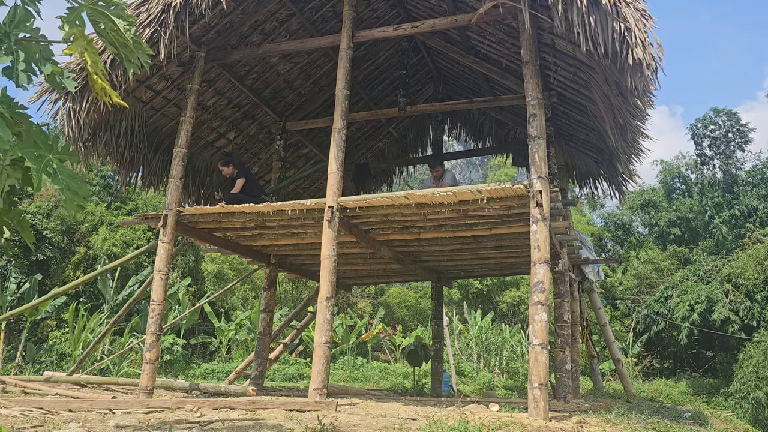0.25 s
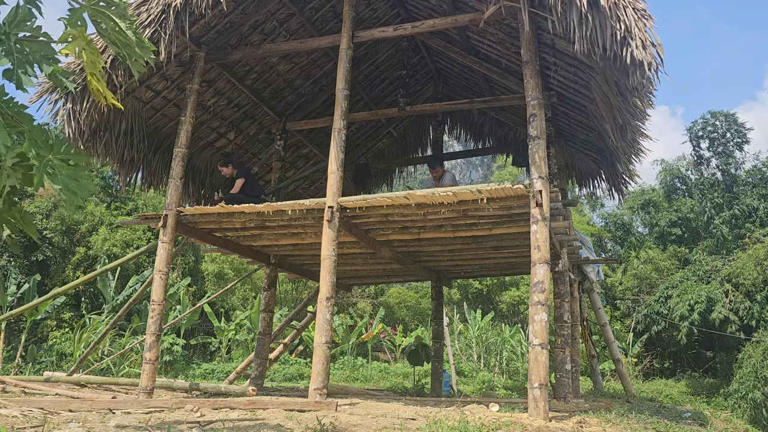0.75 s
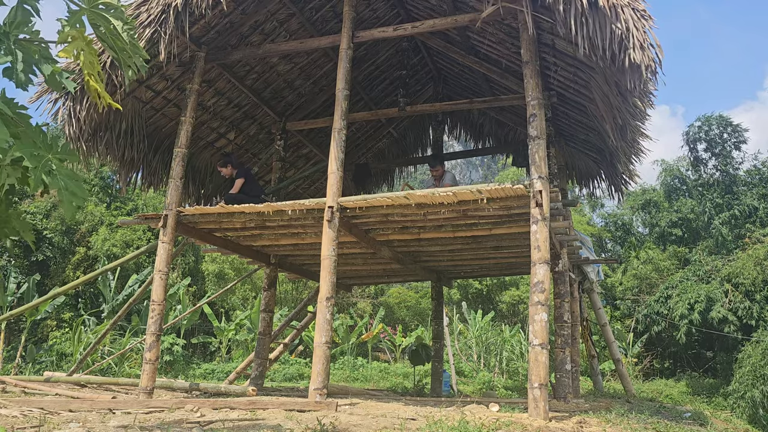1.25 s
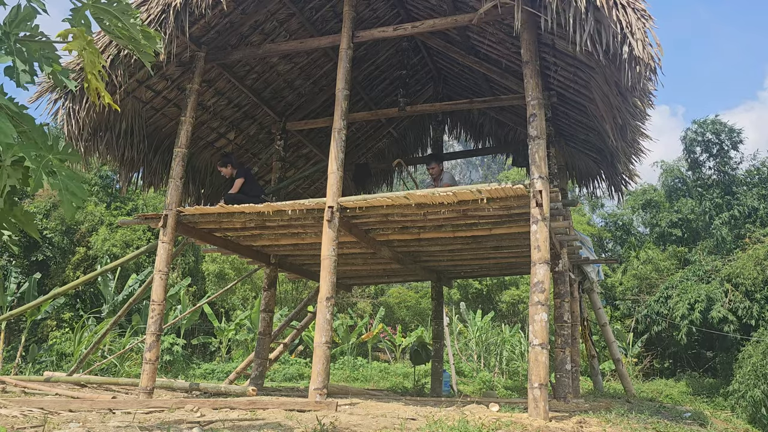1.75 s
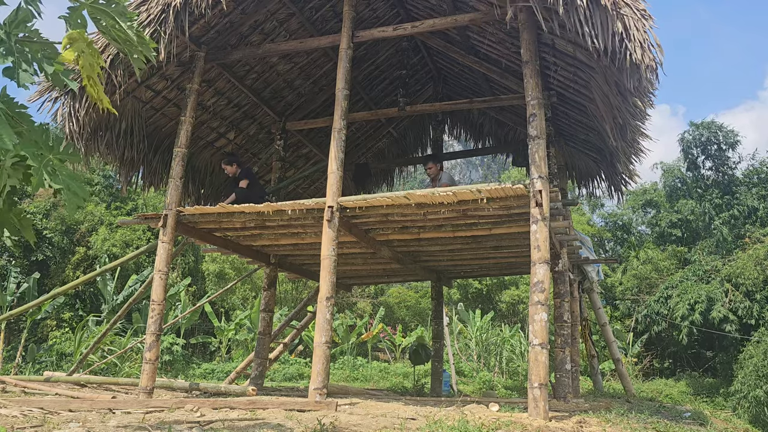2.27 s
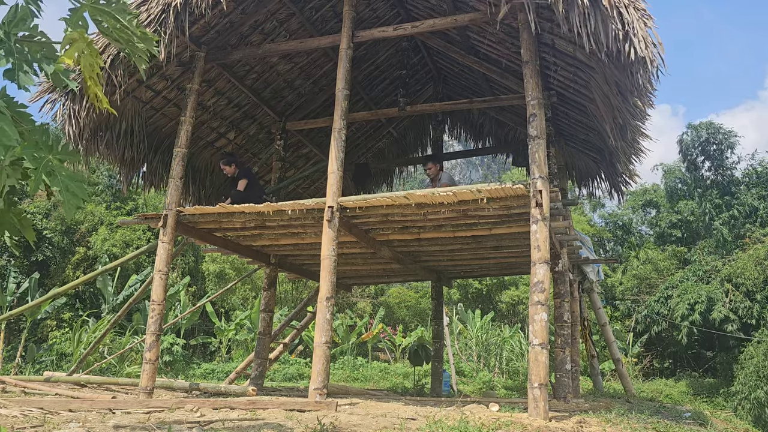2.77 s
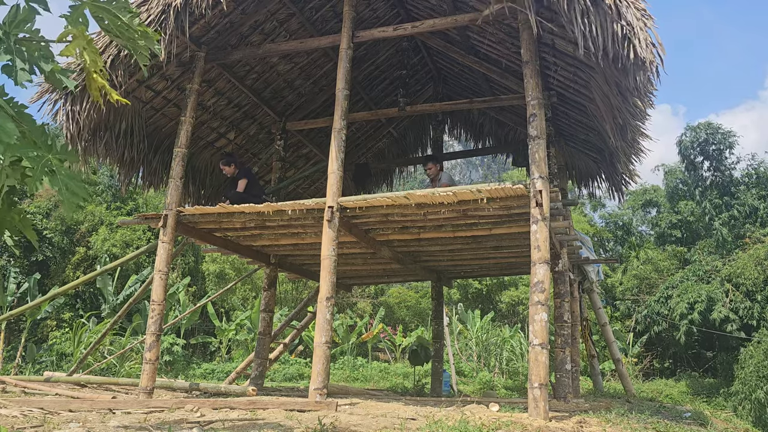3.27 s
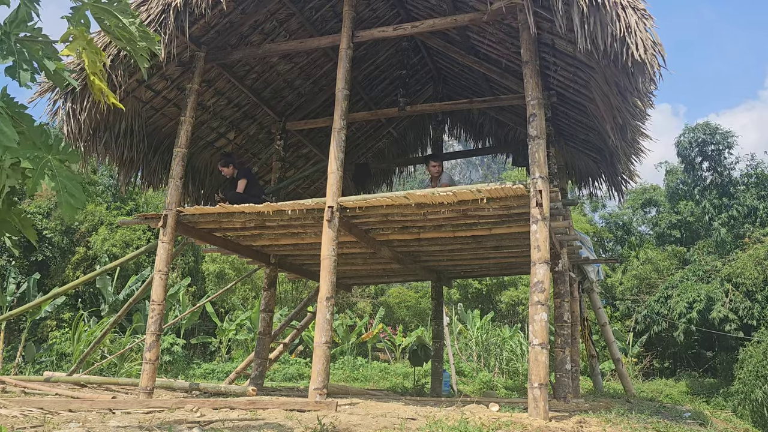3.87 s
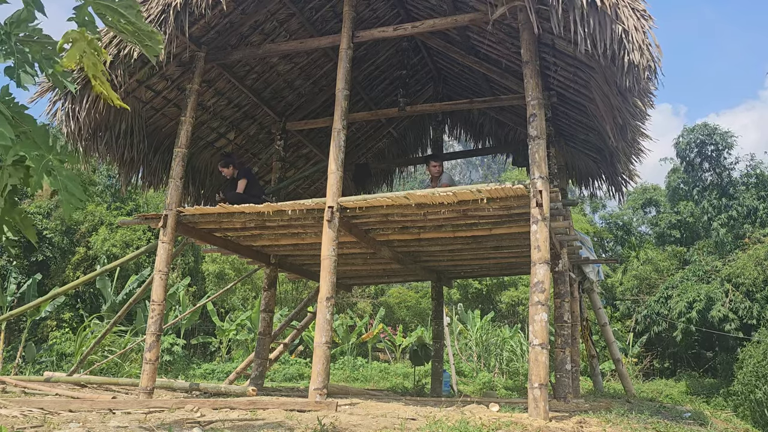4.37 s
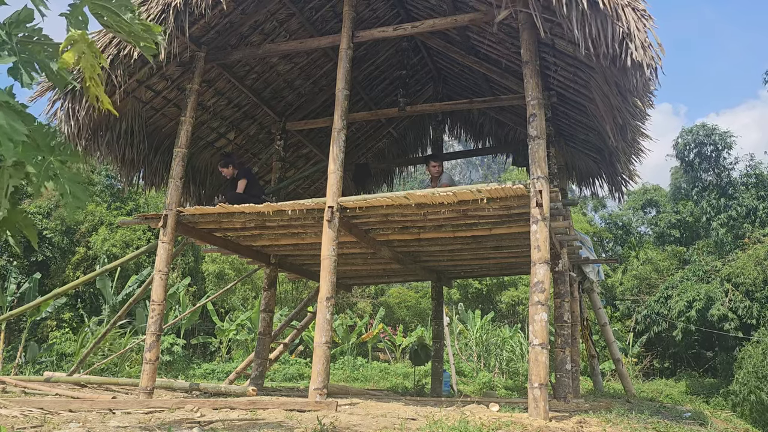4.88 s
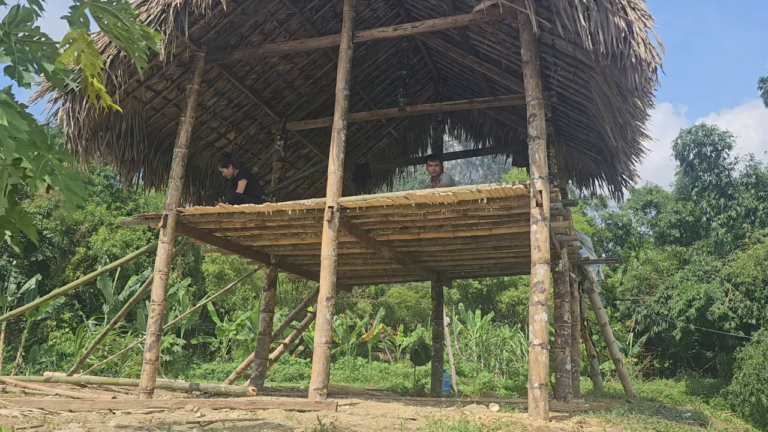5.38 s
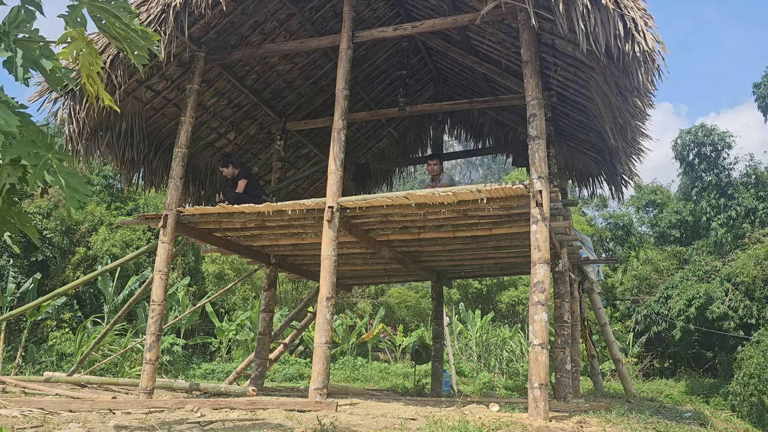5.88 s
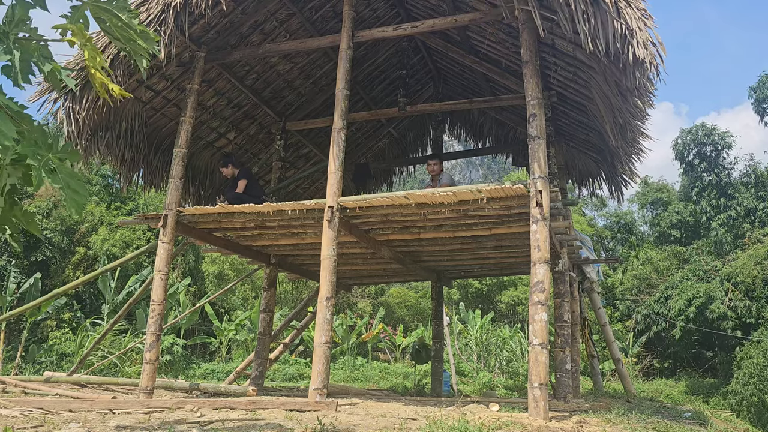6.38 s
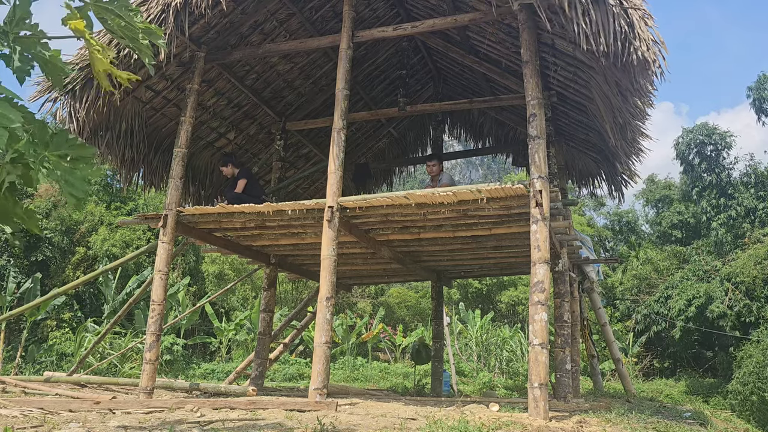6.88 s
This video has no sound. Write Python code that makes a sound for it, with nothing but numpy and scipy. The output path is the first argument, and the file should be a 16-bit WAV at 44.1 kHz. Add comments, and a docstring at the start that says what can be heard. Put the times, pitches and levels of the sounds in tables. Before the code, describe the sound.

A rural yard beside an open thatched stilt house, in stereo from a modest distance. From 0.04 s a blade chops the split-bamboo floor roughly every 0.46 s: dry, woody cracks around 1 to 3 kHz with crisp splinters, a brief hollow cane note near 1.05 kHz and a short scatter under the roof. Three short saw strokes rasp at about 0.2, 0.5 and 0.85 s, ringing a pole near 750 Hz, the last strongest. After the chop at 1.87 s a beat is missed; faint slat ticks fall at 2.45 to 2.65 s, and chopping resumes at 2.75 s. Soft hollow rebounds follow blows at 3.7 and 4.6 s. From 5.5 s blows slow slightly, to 7.05 s. Throughout, a throbbing cicada whines near 4.75 kHz, fading after 5 s, over a narrow distant insect hiss, faint leaf rustle and uneven low wind rumble with brief gusts.

```python
"""Yard of a thatched stilt house: a blade chops into its split-bamboo floor, about two blows a second.
Each blow crushes fibres (noise burst), rings the hollow cane and slats (damped modes) and scatters
under the roof; twice a loose cane rocks back, and slats tick lightly. At first a saw takes three
strokes: noisy tooth catches drive a rasp and a ringing pole. Cicadas sing (frequency-swung partials,
narrow-band hiss); a light breeze rumbles at the microphone over leaf rustle (coloured noise)."""
import sys
import numpy as np
from scipy import signal
from scipy.fft import rfft, irfft, next_fast_len
from scipy.io import wavfile
from scipy.ndimage import uniform_filter1d

SR = 44100
rng = np.random.default_rng(int(sys.argv[2]) if len(sys.argv) > 2 else 0)


def digitize_waveform(pressure):
    """Quantize a signal to 16-bit integers and store it at the path in sys.argv[1].

    Rows of a 2-D input are taken as channels; values are limited to [-1, 1].
    """
    field = np.atleast_2d(pressure).T
    bounded = np.clip(field, -1, 1)
    quanta = np.round(bounded * 32767).astype(np.int16)
    wavfile.write(sys.argv[1], SR, quanta)


N = 314874  # samples

# chops: t/s, faint noisy onset ahead of blow/s, crushing time/s, cane pitch f/Hz, struck-spot pitch f/Hz,
# spot re crack level/dB, cane ring level/dB, crack level/dB, splinter level/dB
CHOPS = [(0.0363, 0.0039, .0008, 1040, 2660, -0.5, -53, -37.5, -38),
         (0.4894, 0.0023, 0.00033, 1045, 2550, -2.5, -38, -34.5, -39.5),
         (0.9496, 0.0054, 0.00079, 1150, 2340, -22, -47.5, -36.5, -41),
         (1.4084, .0037, 0.0017, 1030, 2520, -16, -44, -37.5, -40),
         (1.867, 0.0055, 0.0015, 1057, 1490, -12, -42, -37, -39.5),
         (2.7479, 0.0017, 0.00087, 1070, 2420, 3.5, -45, -35.5, -40),
         (3.1987, 0.00099, 0.0015, 1041, 1590, -6, -44.5, -40, -39),
         (3.6653, 0.0033, 0.0041, 1080, 2160, -7, -39, -38, -43.5),
         (4.1273, 0.0027, 0.0029, 1127, 940, -11, -39.5, -37.5, -40),
         (4.5863, 0.0043, 0.0031, 1076, 2130, -5, -41, -39, -36),
         (5.0511, .0039, 0.0017, 1078, 2450, -12, -34.5, -37.5, -35),
         (5.524, .0047, 0.013, 1080, 1420, -8, -35.5, -39, -41),
         (6.066, 0.0035, 0.0054, 1038, 1670, -15, -43, -40, -42.5),
         (6.5585, 0.0071, 0.0025, 1047, 1520, -2, -38, -34, -41),
         (7.045, 0.011, 0.0014, 1078, 1580, -20, -37, -39.5, -44)]
# floor slat modes: f/Hz, level/dB, t60/s
SLAT_MODES = [(456, -16.5, 0.6), (578.6, -1, 0.098), (685, -15, 0.21), (821, -0.5, 0.065), (1249, -5, 0.21),
              (1514, -6, 0.14), (2274, 0.5, 0.035), (3500, -1.5, 0.0083)]
# crack colour of a blow: f/Hz, level/dB
CRACK_COLOUR = [(100, -28.5), (400, -15), (600, -11.5), (1000, 1.5), (1300, 0), (1600, 2.5), (2600, 0),
                (3600, -2), (4800, -41), (9000, -39.5)]
# splinter colour of a blow: f/Hz, level/dB
SPLINTER_COLOUR = [(1500, -43), (3000, -12), (4200, 3), (5600, 1.5), (7000, -6), (8000, -5), (9800, -8.5),
                   (12000, -4.5), (15500, -12)]
# scatter decay under the roof: f/Hz, t60/s
ROOF_DECAY = [(300, 0.56), (1000, 0.16), (2500, 0.14), (10000, 0.15)]
# left-right likeness of the scatter: f/Hz, correlation/1
ROOF_LIKENESS = [(300, 0.83), (1100, 0.94), (2200, 0.81), (4000, 0.3), (12000, 0.091)]
# floor edge shading the direct treble: f/Hz, level/dB
FLOOR_EDGE_SHADOW = [(5500, 2.5), (8000, 3), (15000, -19)]
# loose cane rocking back: t/s, level/dB
REBOUNDS = [(3.709, -53), (4.624, -48)]
# loose cane modes: f/Hz, level/dB
LOOSE_CANE_MODES = [(1085, 1), (1500, -2)]
REBOUND_RISE_S, REBOUND_T60_S = 0.0073, 0.07
# light handling taps: t/s, wood level/dB, splinter level/dB
TAPS = [(2.464, -71, -70), (2.532, -66.5, -55.5), (2.642, -68.5, -74), (4.393, -89, -70)]
# saw strokes, push and pull in turn: full bite at t/s, held for/s, level/dB
SAW_STROKES = [(.218, 0.1, -43.5), (0.528, 0.11, -50), (.838, 0.038, -39.5)]
# sawn pole modes: f/Hz, width/Hz, level/dB
POLE_MODES = [(264, 24, -1.5), (565.5, 18, -1), (640, 46, -3), (751, 16.4, 6.5), (1004, 45, -3.5),
              (1133, 16, -7.5), (1560, 69, -15), (1920, 110, -19)]
# tooth rasp colour: f/Hz, level/dB
TEETH_COLOUR = [(400, -19.5), (1200, -5.5), (2200, -1), (3200, -2), (5000, -10), (8000, -11.5),
                (12000, -13.5), (15500, -19)]
# left-right likeness of the rasp: f/Hz, correlation/1
RASP_LIKENESS = [(700, 0.94), (1400, 0.77), (3100, 0.12), (9000, 0.09)]
SAW_RISE_DB_PER_S, SAW_FALL_DB_PER_S = 210, 360  # the blade speeds up, then stops
TEETH_DB, TEETH_EXPONENT = -48.5, 0.85  # rasp at average force; grows less with force than the pole's ring
# near cicada: t/s, pitch f/Hz, level/dB
NEAR_CICADA = [(0, 4750, -61), (1.2, 4740, -60.5), (1.65, 4740, -63.5), (2.25, 4755, -60.5),
               (3, 4776, -64.5), (3.8, 4790, -62.5), (4.85, 4784, -63), (5.8, 4760, -69.5),
               (7.1, 4680, -79.5)]
# near cicada partials: multiple of tymbal rate/1, level/dB
TYMBAL_PARTIALS = [(4, -19.5), (5, 2), (6, -12.5)]
THROB_MEAN_HZ = 34.4
SWING_START_HZ, TIRES_AT_S, SWING_GROWTH_HZ_PER_S = 31.8, 3.1, 18  # pitch swing within each throb
CHORUS_CENTRE_HZ, CHORUS_MEAN_DB = 5215, -72  # far cicadas
# wind rumble colour: f/Hz, level/dB
RUMBLE_COLOUR = [(12, -34), (20, -12.5), (48, -3), (70, -1), (114, -7.5), (214, -19), (290, -23),
                 (334, -33), (425, -42), (500, -46.5), (650, -65), (1100, -120)]
# leaf rustle colour: f/Hz, level/dB
LEAF_COLOUR = [(150, -5), (300, 1.5), (500, 6.5), (800, 3.5), (1100, 0.5), (2000, 0.5), (4000, -1),
               (5500, -3.5), (7000, -5), (8400, -4.5), (10000, -6), (14000, -9), (16000, -18.5)]
# gusts (> 0 dB) and lulls (< 0 dB): middle t/s, half length/s, level/dB
GUSTS = [(.83, 0.033, 9), (1, 0.14, -6.5), (1.21, 0.15, 5), (2.05, 0.095, 6), (2.5, 0.57, -4.5),
         (3.108, 0.022, 9.5), (4.053, 0.058, -9.5), (4.763, 0.1, 4), (5.103, 0.037, 10), (5.438, 0.041, 4),
         (5.651, 0.073, -7.5), (6.495, 0.26, -3.5), (6.736, 0.027, 5.5), (6.967, 0.092, -11)]
# left-right likeness of rumble and of leaves: f/Hz, correlation/1
RUMBLE_LIKENESS = [(40, 0.97), (130, 0.82), (300, 0.61)]
LEAF_LIKENESS = [(400, 0.79), (1400, 0.016), (8000, 0.043)]
BREEZE_DB, LEAVES_DB = -46.3, -62.0  # steady flow before gusts; rustle
BAND_LIMIT_HZ = 15700


def amp(db):
    """Decibels to gain."""
    return 10 ** (np.asarray(db) / 20)


def unit(x):
    """Scale to rms 1."""
    return x / np.sqrt(np.mean(x ** 2) + 1e-20)


def burst(x):
    """Scale a short sound to the energy of rms 1 over 0.1 s."""
    return unit(x) * np.sqrt(SR / 10 / x.shape[-1])


def along(points, hz):
    """Interpolate (Hz, value) points on a log-frequency axis."""
    f, v = np.transpose(points)
    return np.interp(np.log(hz + 1), np.log(f + 1), v)


def curves(rows):
    """One value per sample for each column after the time."""
    t_s, *columns = np.transpose(rows)
    return [np.interp(np.arange(N) / SR, t_s, column) for column in columns]


def wobble(rate_hz):
    """Smooth random curve with rate_hz random knots a second."""
    knots = rng.standard_normal(int(N * rate_hz / SR) + 4)
    return signal.resample(knots, N)


def filtered(x, response):
    """Multiply the zero-padded spectrum of x by a complex response of frequency."""
    n = x.shape[-1]
    m = 2 * next_fast_len(n // 2 + 4096)
    spectrum = rfft(x, m) * response(np.fft.rfftfreq(m, 1 / SR))
    return irfft(spectrum, m)[..., :n]


def coloured(x, points):
    """Causal minimum-phase filter with the given (Hz, dB) shape."""
    def response(hz):
        cepstrum = irfft(np.log(amp(along(points, hz))))
        half = len(cepstrum) // 2
        cepstrum[1:half] *= 2  # fold to positive time
        cepstrum[half + 1:] = 0
        return np.exp(rfft(cepstrum))
    return filtered(x, response)


def resonance(f, hz, width_hz):
    """Response at f of one damped mode at hz, unity at its peak."""
    return 1j * f * width_hz / (hz * hz - f * f + 1j * f * width_hz)


def ringing(x, hz, t60_s):
    """One mode set ringing by x; its width follows from its decay."""
    width_hz = np.log(1000) / np.pi / t60_s
    return burst(filtered(x, lambda f: resonance(f, hz, width_hz)))


def placed(x, lead_ms, pan_db):
    """Stereo position: positive values make the left earlier and louder."""
    sides = np.array([[0.5], [-0.5]])
    lead_s = sides * lead_ms / 1000
    return amp(sides * pan_db) * filtered(x, lambda hz: np.exp(2j * np.pi * hz * lead_s))


def stereo_noise(likeness, size):
    """White noise pair; the mid/side balance sets left-right correlation by frequency."""
    def mid_side_gains(hz):
        angle = np.arccos(np.clip(along(likeness, hz), -1, 1)) / 2
        return np.array([np.cos(angle), np.sin(angle)])
    mid, side = filtered(rng.standard_normal((2, size)), mid_side_gains)
    return np.array([mid + side, mid - side])


def add(track, sound, t_s):
    """Mix a sound into the track at t_s."""
    part = track[:, max(round(t_s * SR), 0):][:, :sound.shape[1]]
    part += sound[:, :part.shape[1]]


def contact(t, onset_s, crush_s, onset_gain=0.12, snap=5):
    """Force on the cane: a faint noisy onset, the snap of the blow, then fibres giving way."""
    fibres = rng.standard_normal(len(t)) * np.exp(0.5 * rng.standard_normal(len(t)))
    crushing = np.exp(-np.abs(t) / max(crush_s, 1e-4))
    force = fibres * np.where(t >= 0, crushing, onset_gain * (t > -onset_s))
    force[np.searchsorted(t, 0)] += snap
    # bending waves carry the treble faster, which smears the snap
    return filtered(force, lambda hz: np.exp(-1j * np.sqrt(hz / 9)))


def under_roof(force, scatter_db, build_s=0.0005, trees_db=-31, trees_t60_s=0.5):
    """Direct sound, fast-dying scatter from beams and thatch, faint wash from the trees."""
    hz, t, noise = signal.stft(stereo_noise(ROOF_LIKENESS, len(force)), SR, nperseg=128)
    roof = amp(-60 * t / along(ROOF_DECAY, hz)[:, None])
    trees = amp(trees_db - 60 * t / trees_t60_s) / (1 + hz[:, None] / 3000)  # leaves swallow treble
    envelope = np.hypot(roof, trees) * (1 - np.exp(-t / build_s))
    tail = signal.istft(noise * envelope, SR, nperseg=128)[1]
    scatter = signal.fftconvolve(force[None], tail, axes=1)[:, :len(force)]
    direct = coloured(burst(force), FLOOR_EDGE_SHADOW)
    return placed(direct + amp(scatter_db) * burst(scatter), lead_ms=0.1, pan_db=1.0)


def cavity(t, hz, t60_s, filling_s):
    """Air in a cane takes a few ms to swell, then its tone dies quickly."""
    age = np.maximum(t, 0)
    envelope = amp(-60 * age / t60_s) * (1 - np.exp(-age / filling_s))
    return envelope * np.sin(2 * np.pi * hz * age)


def chops():
    """Each blow cracks, splinters, and rings the hollow cane and the slats around it."""
    out = np.zeros((2, N))
    before_s = 0.01
    t = np.arange(SR // 4) / SR - before_s
    for t_s, onset_s, crush_s, cane_hz, spot_hz, spot_db, ring_db, crack_db, splinter_db in CHOPS:
        force = contact(t, onset_s, crush_s)
        blow = under_roof(force, scatter_db=1.0)
        wood = burst(coloured(blow, CRACK_COLOUR))
        spot = ringing(wood, spot_hz, t60_s=0.009)  # wood right under the blade, heavily damped
        crack = amp(crack_db) * burst(wood + amp(spot_db) * spot)
        splinter = amp(splinter_db) * burst(coloured(blow, SPLINTER_COLOUR))
        hollow = cavity(t + onset_s / 2, cane_hz, t60_s=0.062, filling_s=0.012)
        cane = amp(ring_db) * placed(burst(hollow), lead_ms=0.095, pan_db=0.0)
        push = placed(coloured(force, CRACK_COLOUR), lead_ms=0.1, pan_db=-0.5)  # shakes the floor itself
        slats = sum(amp(db + 2 * rng.standard_normal()) * ringing(push, hz, t60_s)
                    for hz, db, t60_s in SLAT_MODES)
        slats_db = (crack_db + ring_db) / 2 - 13.5
        add(out, crack + splinter + cane + amp(slats_db) * slats, t_s - before_s)
    return out


def rebounds():
    """A loose cane settles back on its beam with a soft hollow knock of two cavity tones."""
    out = np.zeros((2, N))
    t = np.arange(SR // 4) / SR
    for t_s, level_db in REBOUNDS:
        knock = sum(amp(db) * cavity(t, hz, REBOUND_T60_S, REBOUND_RISE_S)
                    for hz, db in LOOSE_CANE_MODES)
        add(out, amp(level_db) * placed(burst(knock), lead_ms=0.11, pan_db=1), t_s)
    return out


def taps():
    """Loose slats tick as they are handled: brief contacts ring one wood mode."""
    out = np.zeros((2, N))
    t = np.arange(SR // 4) / SR
    for t_s, wood_db, splinter_db in TAPS:
        tick = under_roof(contact(t, 0, crush_s=0.0021), scatter_db=7)
        body = burst(coloured(tick, CRACK_COLOUR))
        wood = burst(body + amp(-3) * ringing(tick, hz=1640, t60_s=0.06))
        splinter = burst(coloured(tick, SPLINTER_COLOUR))
        add(out, amp(wood_db) * wood + amp(splinter_db) * splinter, t_s)
    return out


def stroke(bite_s, held_s):
    """Saw stroke level in dB re full bite: rise, hold, fall."""
    t = np.arange(N) / SR - bite_s
    rise_db = -SAW_RISE_DB_PER_S * np.maximum(-t, 0)
    fall_db = -SAW_FALL_DB_PER_S * np.maximum(t - held_s, 0)
    return rise_db + fall_db


def saw():
    """Teeth catch in a pole on the right; stroke force drives a rasp and the pole's hollow ring."""
    force = sum(amp(db + stroke(bite_s, held_s)) for bite_s, held_s, db in SAW_STROKES)
    average = amp(np.mean([db for _, _, db in SAW_STROKES]))
    catches = amp(1.6 * wobble(260) + 0.9 * wobble(45.24))
    rasp = placed(catches * stereo_noise(RASP_LIKENESS, N), lead_ms=-0.051, pan_db=0)
    pole = filtered(rasp, lambda f: sum(amp(db) * resonance(f, hz, width_hz)
                                        for hz, width_hz, db in POLE_MODES))
    teeth_gain = amp(TEETH_DB) * (force / average) ** TEETH_EXPONENT
    return force * unit(pole) + teeth_gain * unit(coloured(rasp, TEETH_COLOUR))


def phase(hz):
    """Running phase in radians of a varying frequency."""
    return 2 * np.pi * np.cumsum(hz) / SR


def near_cicada():
    """Tymbal partials whine in fast throbs whose pitch swing widens as the insect tires."""
    pitch_hz, level_db = curves(NEAR_CICADA)
    tired_s = np.maximum(np.arange(N) / SR - TIRES_AT_S, 0)
    swing_hz = SWING_START_HZ + SWING_GROWTH_HZ_PER_S * tired_s
    throb = np.cos(phase(THROB_MEAN_HZ + 1.63 * wobble(4.3)))
    tymbal = phase(pitch_hz + swing_hz * throb + 9 * wobble(200)) / 5  # pitch is the fifth partial
    whine = sum(amp(db) * np.sin(round(k) * tymbal) for k, db in TYMBAL_PARTIALS)
    flutter_db = 1.1 * throb + 1.6 * wobble(170)
    near = amp(level_db) * unit(whine * amp(flutter_db))
    return placed(near, lead_ms=-0.022, pan_db=0.0)


def far_cicadas():
    """Many distant singers blur into a narrow hiss: a drifting carrier under random modulation."""
    carrier = phase(CHORUS_CENTRE_HZ + 15 * wobble(0.73))

    def hiss():
        """One channel of narrow-band noise."""
        return unit(wobble(320) * np.sin(carrier) + wobble(220) * np.cos(carrier))
    level_db = CHORUS_MEAN_DB + 1.2 * wobble(0.95)
    return amp(level_db) * np.array([hiss(), hiss()])


def breeze():
    """Low lumps of wind, levelled and then shaped by gusts and eddies."""
    t = np.arange(N) / SR
    level_db = BREEZE_DB + sum(db * np.exp(-((t - t_s) / half_s) ** 2) for t_s, half_s, db in GUSTS)
    lumps = coloured(stereo_noise(RUMBLE_LIKENESS, N), RUMBLE_COLOUR)
    power = uniform_filter1d(np.mean(lumps ** 2, axis=0), size=SR // 5)
    lumps /= np.sqrt(np.abs(power))  # even flow, so that gusts set the level
    eddies_db = 1.9 * wobble(20)
    return placed(amp(level_db + eddies_db) * lumps, lead_ms=0.009, pan_db=-2.5)


def leaves():
    """Faint steady rustle of leaves: coloured noise, mostly unlike left and right."""
    return amp(LEAVES_DB) * unit(coloured(stereo_noise(LEAF_LIKENESS, N), LEAF_COLOUR))


def scene():
    """Work on the floor, and the yard around it."""
    work = chops() + rebounds() + taps() + saw()
    yard = near_cicada() + far_cicadas() + breeze() + leaves()
    return work + yard


def record(dry):
    """Steep low-pass at the band limit."""
    return filtered(dry, lambda hz: 1 / (1 + (hz / BAND_LIMIT_HZ) ** 120))


dry = scene()
out = record(dry)
digitize_waveform(out)
```